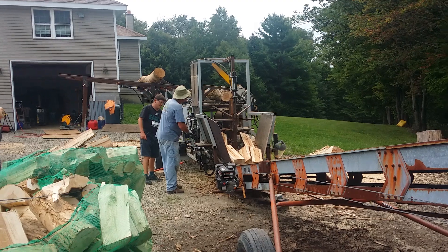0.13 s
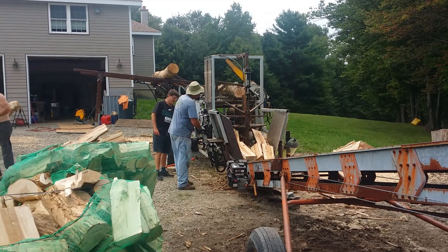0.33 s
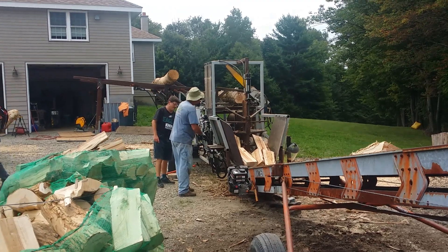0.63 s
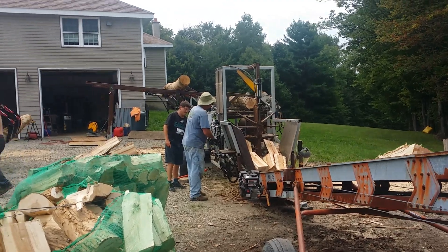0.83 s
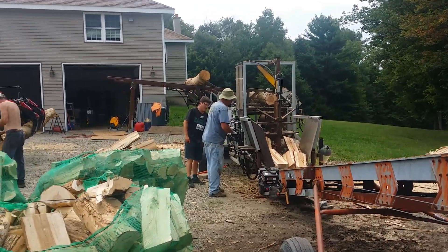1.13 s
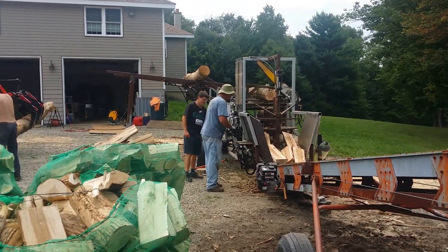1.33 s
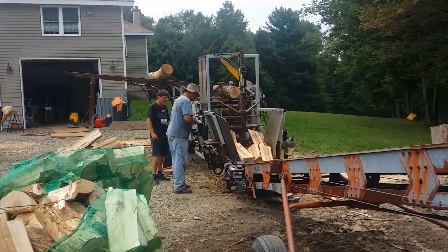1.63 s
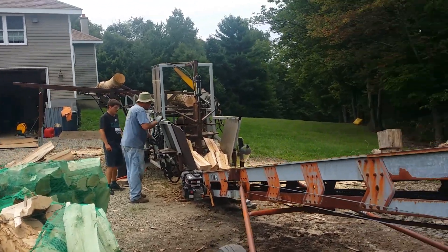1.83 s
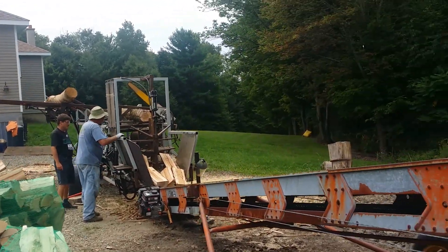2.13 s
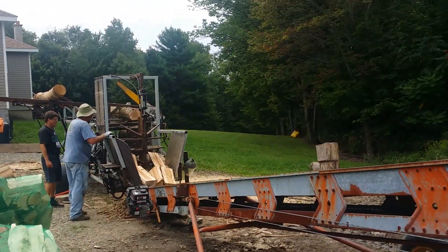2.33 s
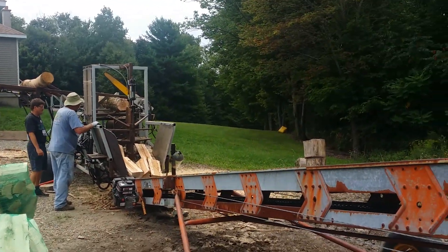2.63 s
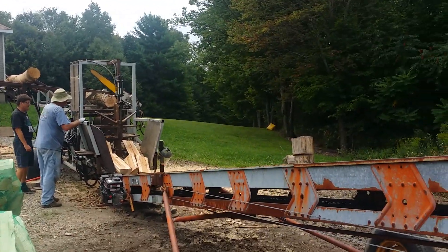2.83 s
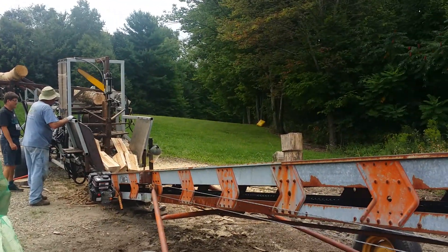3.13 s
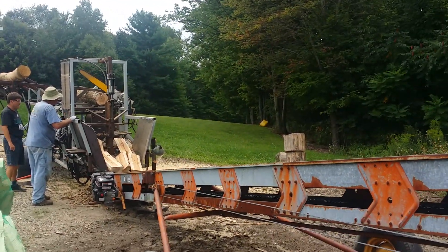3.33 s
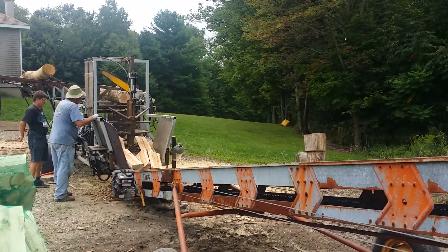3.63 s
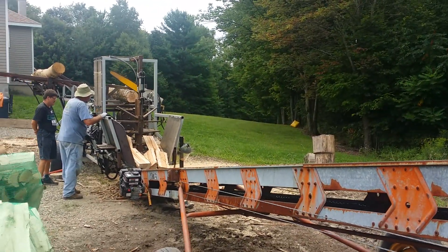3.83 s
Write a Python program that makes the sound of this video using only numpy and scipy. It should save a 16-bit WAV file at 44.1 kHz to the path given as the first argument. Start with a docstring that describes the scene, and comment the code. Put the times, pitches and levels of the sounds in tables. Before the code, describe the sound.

A firewood processing machine drones loudly while logs thud and its conveyor chain clanks.

```python
"""The two engines of a firewood processor drone: one holds its speed, the other sags under load
and recovers. Each hums at multiples of its turning rate, and the working one also puffs exhaust.
Split logs thud on steel, the conveyor chain rattles and clanks, and behind them the machinery
roars and hisses. The sound fades in."""
import sys
import numpy as np
from scipy import signal
from scipy.fft import rfft, irfft, next_fast_len
from scipy.io import wavfile
from scipy.ndimage import uniform_filter1d, map_coordinates

SR = 44100
rng = np.random.default_rng(int(sys.argv[2]) if len(sys.argv) > 2 else 0)


def store_pcm(level_fs):
    """Save levels as 16-bit WAV."""
    pcm = np.round(np.clip(level_fs, -1, 1) * 32767).astype(np.int16)
    wavfile.write(sys.argv[1], SR, np.atleast_2d(pcm).T)


N = 176400

# All levels are relative. A spectrum says how strong a noise is at each frequency.
# Tones of the steady engine: multiple of the shaft rate, level/dB
STEADY_TONES = [(1, -45.5), (2, -28), (3, -24), (4, -38), (5, -33), (7, -41.5)]
# Loudness of those tones: t/s, level/dB
STEADY_LOUDNESS = [(.5, -3), (1.05, -3.5), (1.4, 2), (2, -.5), (3, .5), (4, 1.5)]
# Speed of the working engine: t/s, cycle rate/Hz
WORK_RATE = [(.4, 25), (.9, 24.7), (1.1, 25.1), (1.46, 25.2), (1.62, 22), (1.82, 24.7), (2.05, 24.4),
             (2.22, 23.6), (2.5, 23.87), (4, 23.85)]
# Tones of the working engine: multiple of the cycle rate, level/dB
WORK_TONES = [(2, -52), (3, -33), (5, -25), (6, -29.5), (7, -37.5), (8, -32), (9, -39.5), (13, -53),
              (22, -42.5)]
# Loudness of those tones: t/s, level/dB
WORK_LOUDNESS = [(.5, -9), (1.1, -8), (1.35, -0.5), (1.65, -3.5), (2, -6.5), (2.4, 0.5), (3.2, -0.5),
                 (4, 0.5)]
# Spectrum of the exhaust puffs: f/Hz, level/dB
PUFF_SPECTRUM = [(25, -45), (60, -29), (95, -18), (135, -10.5), (165, -5.5), (187, 0), (220, -8),
                 (280, -13.5), (400, -28), (900, -60)]
# Loudness of the puffs: t/s, level/dB
PUFF_LOUDNESS = [(.7, -25.5), (1.1, -23.5), (1.4, -29.5), (1.55, -18), (1.75, -26.5), (2, -21), (2.3, -24),
                 (2.8, -23), (3.3, -25.5), (3.9, -23)]

# Logs landing: t/s, level/dB, time to fade by 60 dB/s, rise time/s
LOG_LANDINGS = [(0.895, -12, .4, 0.0074), (1.204, -12, 0.55, 0.0071), (1.473, -11, 0.37, 0.0028),
                (1.747, -9.5, 0.33, 0.01), (1.975, -22, 0.27, .005), (2.03, -21, 0.23, 0.006),
                (2.935, -14, 0.14, 0.0036), (3.56, -14, 0.15, .005)]
# Pitches at which wood and steel trough ring: f/Hz, width/Hz, level/dB
LOG_RINGS = [(396, 70, -3.5), (518, 57, 3.5), (702, 180, 1), (826, 160, -2), (1050, 130, -5.5),
             (1540, 140, -4), (1860, 590, -9.5)]
# Chain clanks: t/s, level/dB, time to fade by 60 dB/s, share of low ring/dB, share of sharp tick/dB
CHAIN_CLANKS = [(.542, -28.5, 0.072, -6, -14), (.844, -18.5, 0.22, -1, -20), (0.893, -23.5, 0.49, -9, -7),
                (1.06, -25.5, 0.074, 11, -5), (1.15, -19, 0.19, 0.5, -10), (1.202, -20.5, 0.32, -5, -14),
                (1.271, -22.5, 0.087, -2, 5), (1.454, -22, 0.14, -12, -2), (1.476, -22.5, 0.2, 1.5, -17),
                (1.663, -22, .08, -4, -12), (1.752, -21.5, .25, -8, -20), (1.887, -26, 0.067, -16, -6),
                (1.965, -19.5, .12, -6, -4), (1.979, -19, .1, 2, -14), (2.073, -13, 0.13, -1, -13),
                (2.108, -18, 0.059, -5, -14), (2.376, -12.5, 0.084, -4, -8), (2.655, -18, 0.16, -1, -3),
                (2.857, -16.5, 0.076, -0.5, -9), (2.96, -21, 0.19, -8, -6), (3.052, -22, 0.065, -3, 3),
                (3.166, -19.5, 0.12, 0, -10), (3.275, -22, 0.33, -5, -3), (3.364, -22.5, 0.088, -9, -12),
                (3.481, -18, 0.24, -19, -17), (3.574, -17, .07, -3, -10), (3.79, -25, 0.19, -3, -10)]
# Spectrum of a clank's bright ring: f/Hz, level/dB
BRIGHT_RING = [(1500, -12), (2800, -1), (4100, 7.5), (5200, 3), (6400, 3.5), (9000, 0), (11500, -8),
               (15500, -56)]
# Spectrum of its low ring: f/Hz, level/dB
LOW_RING = [(400, -20), (900, -10.5), (1500, -9), (2100, 3.5), (2700, -9), (4000, -50)]
# Spectrum of its sharp tick: f/Hz, level/dB
SHARP_TICK = [(5000, -30), (7000, 6), (8000, -5), (9000, 10), (10500, -13), (12300, 4), (15500, -28)]

# Spectrum of the machinery's roar: f/Hz, level/dB
ROAR_SPECTRUM = [(160, -23), (280, -10), (350, -3), (425, -6.5), (530, -0.5), (630, -5), (790, -6),
                 (920, -2.5), (1200, -8), (1450, -5), (1650, -8), (2050, -10), (2400, -14), (3200, -21),
                 (7000, -35)]
# Loudness of the roar: t/s, level/dB
ROAR_LOUDNESS = [(.5, -23.5), (.8, -22.5), (1.1, -22.5), (1.4, -20), (1.7, -21.5), (2.05, -19), (2.3, -20),
                 (2.8, -20), (3.35, -17.5), (3.7, -20.5), (4, -17.5)]
# Spectrum of the rattling hiss: f/Hz, level/dB
HISS_SPECTRUM = [(1650, -17), (2800, -4), (3200, -3.5), (4000, -1), (5250, -2.5), (6570, 2), (7620, -3.5),
                 (8890, -2), (10000, -10.5), (13000, -14)]
# Spectrum of the fizz, the highest part of that hiss: f/Hz, level/dB
FIZZ_SPECTRUM = [(7000, -30), (10000, 0), (12500, 0), (15500, -4.5)]
# Loudness of both: t/s, hiss level/dB, fizz level/dB
HISS_LOUDNESS = [(0.7, -32.5, -43), (0.86, -32, -39.5), (1.14, -33.5, -40), (1.88, -27.5, -34.5),
                 (2.19, -28.5, -33), (2.9, -27.5, -32), (3.15, -26, -31.5), (3.47, -27, -32.5),
                 (3.6, -28, -33), (4.0, -25.5, -30.5)]
# Spectrum of a thin, high hiss: f/Hz, level/dB
THIN_SPECTRUM = [(5200, -18), (6200, -3), (6700, -1), (7200, -9), (8200, -41)]
# Loudness of the thin hiss: t/s, level/dB
THIN_LOUDNESS = [(.6, -43), (2, -53), (3, -48), (3.4, -30.5), (3.7, -28), (4, -30)]

# How alike the left and right noises are: f/Hz, likeness (1 = the same)
LIKENESS = [(30, .88), (70, .985), (200, .96), (400, .82), (680, .76), (900, .3), (1300, .2), (2100, .38),
            (3000, .2), (14000, .1)]
# How much louder the left side is: f/Hz, level/dB
LEFT_BOOST = [(60, 1.2), (330, 1.5), (800, .7), (1200, -.8), (1800, -1.5), (2700, 1.7), (4200, 3.4),
              (6400, 3.2), (9800, -3.6), (15000, 0)]
# How much later the left side is: f/Hz, delay/s
LEFT_DELAY = [(200, .0001), (500, .00021), (1300, .0004), (15000, .0004)]

PUFF_GAIN_DB, HISS_GAIN_DB, FIZZ_GAIN_DB = 1, 4, 3.5  # added to the loudness tables
FADE_START_S, FADE_S = .387, 0.2
PEAK_LIMIT, TOP_HZ, TOP_SLOPE_HZ = .95, 15750, 250


def engine(turns, tones, loudness, waver_db):
    """An engine repeats itself as it turns, so it hums at whole multiples of that rate."""
    hum = 0
    for multiple, db in tones:
        strength = np.sqrt(2) * amp(db + waver_db * wobble(14))
        hum += strength * np.sin(2 * np.pi * (multiple * turns + rng.random()))
    level_db, = curves(loudness)
    return amp(level_db) * hum


def exhaust(cycles):
    """The working engine pushes out two rough puffs of gas in each cycle."""
    level_db, = curves(PUFF_LOUDNESS)
    puffs = firing(2 * cycles, depth_db=14)
    return amp(level_db + PUFF_GAIN_DB) * noise(PUFF_SPECTRUM, puffs)


def logs():
    """Each log lands with a short judder that makes the wood and the steel trough ring."""
    def ringing(hz):
        return sum((-1) ** k * amp(db) * 1j * hz * width / (pitch ** 2 - hz ** 2 + 1j * hz * width)
                   for k, (pitch, width, db) in enumerate(LOG_RINGS))

    blows = sum(amp(db) * strike(start, fade, rise) for start, db, fade, rise in LOG_LANDINGS)
    judder = rattle(per_s=2000, variety_db=4.5, life_s=0.0018) * rng.standard_normal((2, N))
    return blows * stereo(judder, ringing)


def chain():
    """Links and paddles clank along the conveyor, each with its own share of low ring and sharp tick."""
    blows = np.array([amp(db) * strike(start, fade, rise_s=0.0005)
                      for start, db, fade, _, _ in CHAIN_CLANKS])
    low_db, tick_db = np.transpose(CHAIN_CLANKS)[3:]
    chatter = rattle(per_s=1500, variety_db=2, life_s=0.0016)
    parts = [(blows.sum(axis=0), BRIGHT_RING),
             (amp(low_db) @ blows, LOW_RING),
             (amp(tick_db) @ blows, SHARP_TICK)]
    return sum(loudness * noise(spectrum, chatter, ring_db=3.8) for loudness, spectrum in parts)


def machinery_roar(turns):
    """The machinery roars, pulsing each time the steady engine fires."""
    level_db, = curves(ROAR_LOUDNESS)
    roughness = 2 + 0.47 * rattle(per_s=200, variety_db=3.5, life_s=0.0027)
    pulses = firing(turns, depth_db=2) * roughness
    return amp(level_db + .9 * wobble(45)) * noise(ROAR_SPECTRUM, pulses, ring_db=1)


def rattling_hiss():
    """Many tiny taps of chain on steel blur into a hiss with a fizz on top."""
    hiss_db, fizz_db = curves(HISS_LOUDNESS)
    taps = 0.5 + rattle(per_s=220, variety_db=2.5, life_s=0.008)
    hiss = amp(hiss_db + HISS_GAIN_DB) * noise(HISS_SPECTRUM, taps, ring_db=1.5)
    fizz = amp(fizz_db + FIZZ_GAIN_DB) * noise(FIZZ_SPECTRUM, taps, ring_db=2)
    return hiss + fizz


def thin_hiss():
    """A thin, high hiss swells near the end."""
    level_db, = curves(THIN_LOUDNESS)
    return amp(level_db) * noise(THIN_SPECTRUM)


def firing(count, depth_db):
    """Loudness that jumps at each firing (each whole number of count) and sinks until the next."""
    return unit(amp(-depth_db * (count % 1)))


def strike(start_s, fade_s, rise_s):
    """Loudness of one blow: it rises quickly and dies away by 60 dB every fade_s."""
    age = np.maximum(np.arange(N) / SR - start_s, 0)
    return (1 - np.exp(-age / rise_s)) * np.exp(-np.log(1000) * age / fade_s)


def rattle(per_s, variety_db, life_s):
    """Loudness of many small, random taps of chain links and chips."""
    sizes = amp(variety_db * np.minimum(rng.exponential(size=N), 3))
    taps = sizes * (rng.random(N) < per_s / SR)
    energy = signal.lfilter([1], [1, -np.exp(-1 / (life_s * SR))], taps ** 2)  # each tap dies away
    return unit(np.sqrt(np.abs(energy)))


def noise(spectrum, pulses=1, ring_db=0):
    """Stereo noise that follows the pulses and is then shaped to a spectrum."""
    return stereo(pulses * ringing_noise(ring_db), lambda hz: amp(at_frequency(spectrum, hz)))


def ringing_noise(depth_db):
    """Two unrelated noises in which random pitches briefly stand out by about depth_db."""
    bands = signal.stft(rng.standard_normal((2, N)), nperseg=512)[2]
    patches = uniform_filter1d(rng.standard_normal(bands.shape[1:]), size=3, axis=0)  # blur in pitch
    patches = uniform_filter1d(patches, size=12, axis=1)  # blur in time
    return signal.istft(bands * amp(depth_db * unit(patches)), nperseg=512)[1][:, :N]


def stereo(pair, gain):
    """Filter two unrelated signals and blend them into a left and right that are partly alike."""
    def blend(hz):
        angle = np.arccos(np.clip(at_frequency(LIKENESS, hz), -1, 1)) / 2
        return gain(hz) * [np.cos(angle), np.sin(angle)]

    middle, side = filtered(pair, blend)
    return unit(np.array([middle + side, middle - side]))


def filtered(x, response):
    """Multiply each frequency in x by response(hz)."""
    size = next_fast_len(N + SR // 2)
    hz = np.fft.rfftfreq(size, 1 / SR)
    return irfft(rfft(x, size) * response(hz), size)[..., :N]


def wobble(per_s):
    """A smooth curve through per_s random values a second."""
    return map_coordinates(rng.standard_normal(2048), [np.arange(N) * per_s / SR], mode="wrap")


def curves(rows):
    """Join a table's points in time with straight lines, one curve for each column after the first."""
    times, *columns = np.transpose(rows)
    return [np.interp(np.arange(N) / SR, times, column) for column in columns]


def at_frequency(rows, hz):
    """Read between the rows of a frequency table, with octaves evenly spaced."""
    frequencies, values = np.transpose(rows)
    return np.interp(np.log(hz + 1), np.log(frequencies + 1), values)


def amp(db):
    """Turn decibels into a number to multiply by."""
    return 10 ** (np.asarray(db) / 20)


def unit(x):
    """Scale x to an average strength (rms) of 1."""
    return x / np.sqrt(np.mean(x ** 2) + 1e-20)


def scene(shaft_hz=50.1):
    """The whole machine, heard slightly earlier on the right."""
    # Adding up a slightly wavering speed counts how far each engine has turned.
    steady_turns = np.cumsum(shaft_hz * (1 + .0012 * wobble(8))) / SR
    work_cycles = np.cumsum(curves(WORK_RATE)[0] * (1 + .003 * wobble(11))) / SR
    drone = engine(steady_turns, STEADY_TONES, STEADY_LOUDNESS, waver_db=1.5)
    drone += engine(work_cycles, WORK_TONES, WORK_LOUDNESS, waver_db=2)
    puffs = exhaust(work_cycles)
    background = machinery_roar(steady_turns) + rattling_hiss() + thin_hiss()

    def direction(hz):
        sides = np.array([[.5], [-.5]])  # left and right each take half, in opposite ways
        balance = amp(sides * at_frequency(LEFT_BOOST, hz))
        delay_s = sides * at_frequency(LEFT_DELAY, hz)
        return balance * np.exp(-2j * np.pi * hz * delay_s)

    return filtered(drone + puffs + logs() + chain() + background, direction)


def record(dry):
    """Fade in from silence, round off the tallest peaks and cut the very highest treble."""
    fade_in = np.clip((np.arange(N) / SR - FADE_START_S) / FADE_S, 0, 1)
    faded = dry * fade_in
    rounded = faded / (1 + (faded / PEAK_LIMIT) ** 8) ** (1 / 8)
    return filtered(rounded, lambda hz: np.clip((TOP_HZ - hz) / TOP_SLOPE_HZ, 0, 1))


dry = scene()
out = record(dry)
store_pcm(out)
```